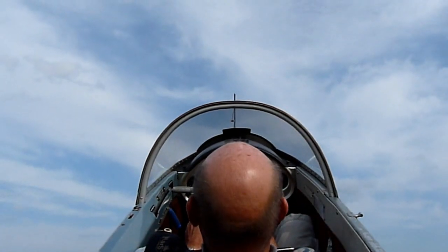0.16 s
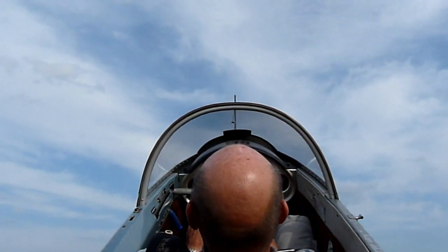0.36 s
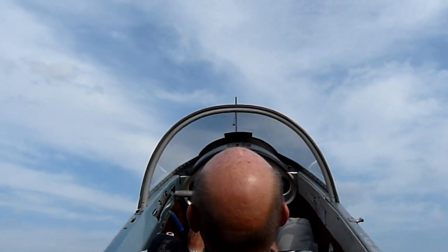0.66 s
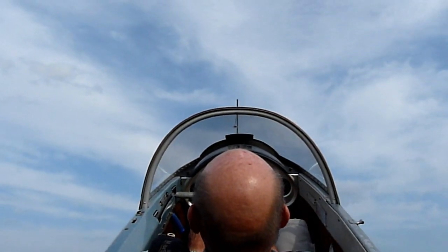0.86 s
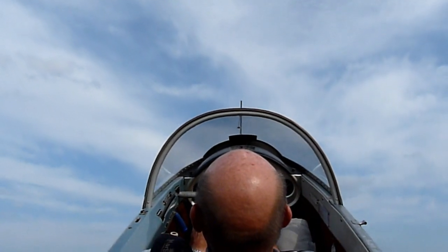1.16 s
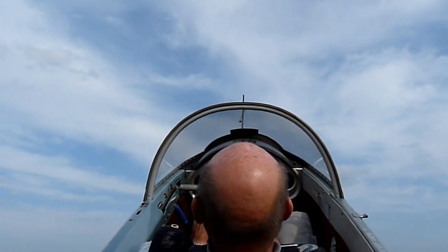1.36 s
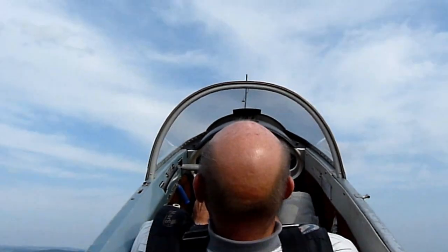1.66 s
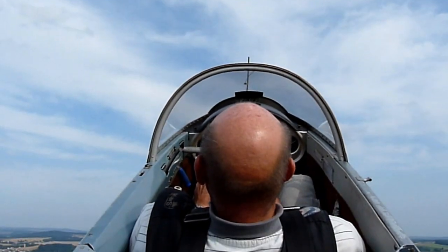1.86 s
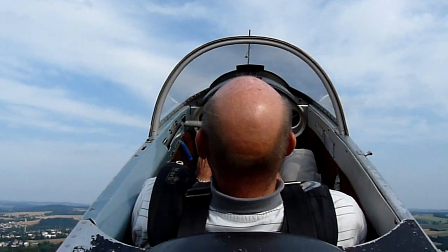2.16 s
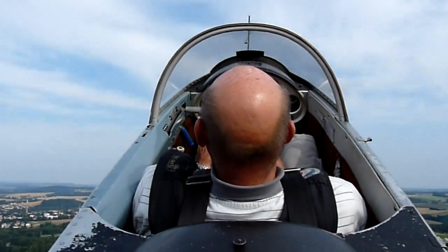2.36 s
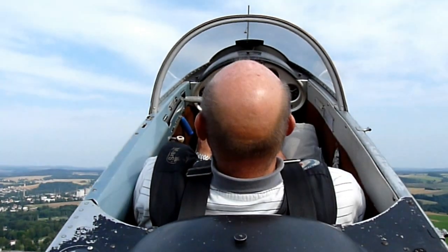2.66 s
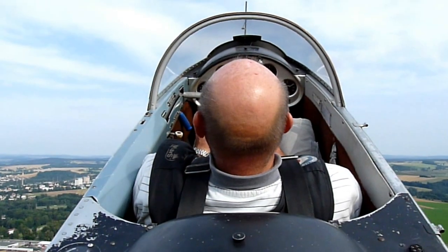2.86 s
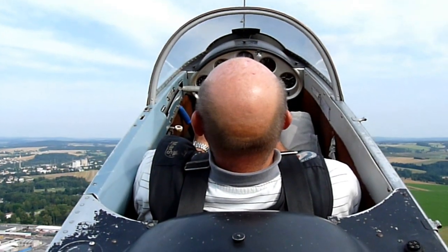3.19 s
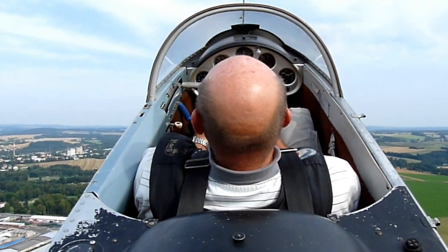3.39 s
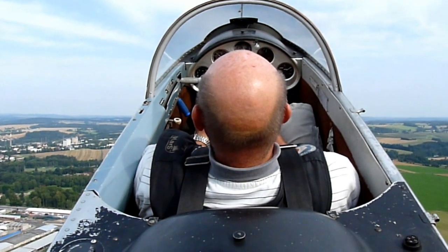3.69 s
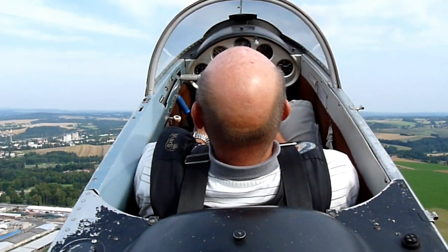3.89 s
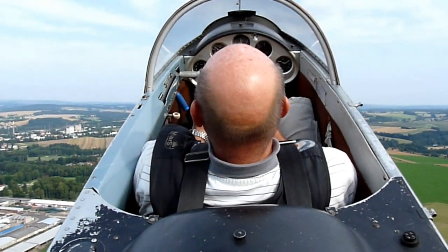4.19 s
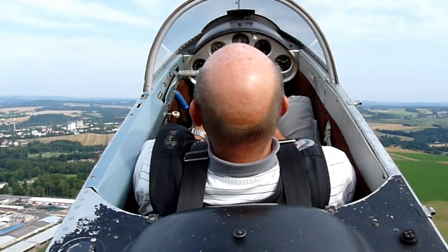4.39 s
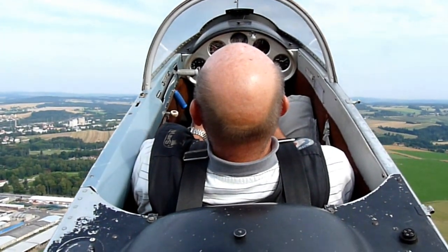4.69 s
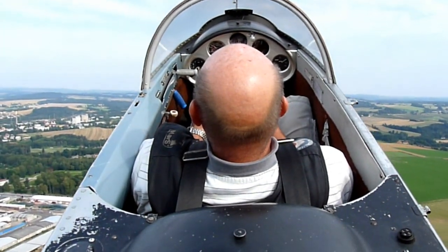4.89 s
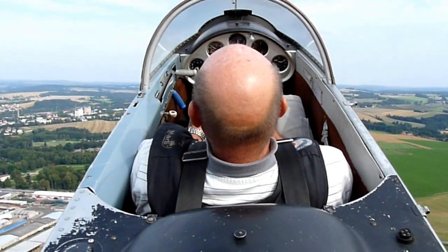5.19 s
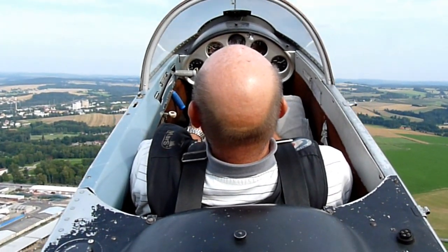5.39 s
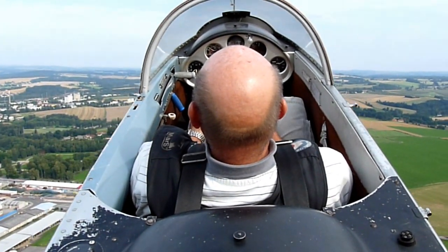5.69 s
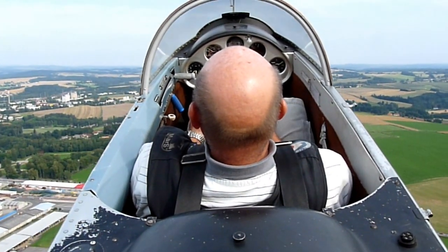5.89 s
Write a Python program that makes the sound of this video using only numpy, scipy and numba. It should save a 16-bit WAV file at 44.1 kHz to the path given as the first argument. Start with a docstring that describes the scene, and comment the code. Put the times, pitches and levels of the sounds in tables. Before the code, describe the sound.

Violent wind buffeting overloads a small camera microphone in an open glider cockpit: ragged low thuds, fluttering crackle and tiny dropouts, without pause.

```python
"""Air rushes past an open glider cockpit and buffets a small camera microphone far beyond its range.
The capsule slams between its two limits and often sticks at the lower one, so the wind arrives as bursts of
thuds with dead gaps; a wind-cut filter, a soft limit and a coarse low-rate converter shape what is left."""
import sys
import numpy as np
from scipy import signal
from scipy.fft import rfft, irfft
from scipy.io import wavfile
from numba import njit

SR = 44100
rng = np.random.default_rng(int(sys.argv[2]) if len(sys.argv) > 2 else 0)


def dump(signal):
    """Clip the signal to [-1, 1] and save it as 16-bit WAV at the path in sys.argv[1]."""
    limited = np.clip(np.atleast_2d(signal).T, -1, 1)
    pcm = np.round(limited * 32767).astype(np.int16)
    wavfile.write(sys.argv[1], SR, pcm)


N = 266805

# (s, small eddies in dB against the buffeting): the airflow slows and smooths as the nose comes down from the climb
TURBULENCE = [(0.0, -11.5), (0.4, -11.5), (0.8, -9.5), (1.2, -6.5), (1.6, -12), (2.0, -8.5), (2.4, -11), (2.8, -20.5), (3.2, -20), (3.6, -13), (4.1, -22), (4.6, -22), (5.0, -21), (5.3, -21.5), (5.7, -17.5), (6.05, -16)]
# the longer spells of suction, heard as dropouts, that hold the capsule at its lower limit: (s, length ms)
SUCTION = [(0.0173, 7.7), (0.0464, 10.8), (0.0661, 8.1), (0.0881, 10.5), (0.2205, 7.7), (0.2417, 10.8),
           (0.2532, 13.4), (0.3007, 10.3), (0.3423, 7.9), (0.3567, 10.3), (0.3745, 10.1), (0.4015, 8.7),
           (0.4224, 9.1), (0.4597, 8.2), (0.4688, 11.1), (0.4812, 8.2), (0.5347, 7.8), (0.55, 8.6), (0.5657, 9.5),
           (0.6232, 15.7), (0.6699, 8.0), (0.6787, 14.0), (0.7444, 9.3), (0.7686, 14.4), (0.7986, 11.0),
           (0.8162, 11.2), (0.8357, 8.8), (0.8682, 15.0), (0.8957, 15.5), (0.9288, 8.8), (0.9913, 10.0),
           (1.0315, 10.1), (1.0587, 9.3), (1.1025, 9.1), (1.1295, 14.6), (1.1574, 10.3), (1.1844, 12.8),
           (1.2022, 10.5), (1.245, 8.5), (1.2863, 8.2), (1.2961, 14.0), (1.3628, 13.7), (1.3811, 7.6),
           (1.4023, 8.0), (1.4131, 9.0), (1.4522, 11.8), (1.5051, 10.4), (1.5233, 11.1), (1.5394, 12.7),
           (1.5656, 8.2), (1.6067, 9.1), (1.6246, 11.3), (1.6359, 8.8), (1.6611, 8.3), (1.6741, 9.2),
           (1.6846, 13.9), (1.7212, 7.6), (1.7289, 13.8), (1.7488, 9.3), (1.7762, 10.7), (1.8085, 10.3),
           (1.8336, 7.8), (1.8436, 8.5), (1.8534, 9.4), (1.8647, 16.0), (1.8968, 12.2), (1.9126, 12.2),
           (1.9268, 13.0), (1.9689, 17.4), (1.993, 9.1), (2.0061, 7.9), (2.0188, 9.1), (2.037, 12.9), (2.0924, 9.1),
           (2.1306, 8.1), (2.1384, 10.0), (2.1519, 12.1), (2.1649, 10.8), (2.2278, 14.4), (2.2816, 9.6),
           (2.3113, 11.4), (2.342, 9.8), (2.3529, 8.0), (2.3665, 11.0), (2.3842, 7.9), (2.4077, 10.8),
           (2.4201, 8.1), (2.4433, 8.3), (2.4633, 12.5), (2.5455, 8.6), (2.555, 15.4), (2.5785, 9.9),
           (2.5954, 10.3), (2.6061, 8.1), (2.6222, 15.8), (2.6587, 8.4), (2.6753, 17.9), (2.7262, 9.5),
           (2.7368, 9.5), (2.7898, 13.8), (2.8254, 10.0), (2.8371, 11.0), (2.8481, 10.3), (2.8596, 9.9),
           (2.8992, 8.0), (2.9089, 18.1), (2.9525, 18.0), (2.9752, 19.9), (3.0117, 11.4), (3.0365, 10.7),
           (3.0589, 9.5), (3.0908, 21.3), (3.1317, 9.1), (3.1482, 10.4), (3.167, 12.9), (3.1888, 9.8),
           (3.2052, 15.3), (3.2821, 13.5), (3.32, 13.3), (3.3522, 10.7), (3.3717, 10.9), (3.3843, 10.0),
           (3.4162, 7.8), (3.427, 17.4), (3.4527, 9.9), (3.4951, 10.5), (3.5407, 8.3), (3.55, 10.2), (3.564, 7.6),
           (3.5714, 12.0), (3.5923, 10.1), (3.6196, 11.7), (3.6325, 9.3), (3.6431, 13.2), (3.6669, 15.7),
           (3.6834, 8.9), (3.7223, 8.7), (3.7384, 10.9), (3.77, 12.2), (3.7988, 16.0), (3.8295, 8.1), (3.8513, 9.6),
           (3.8649, 8.6), (3.8888, 7.6), (3.8972, 16.5), (3.9381, 11.1), (3.9624, 8.3), (3.9716, 13.4),
           (3.9897, 11.5), (4.0027, 7.7), (4.0436, 12.3), (4.0758, 10.5), (4.0873, 10.6), (4.0992, 24.9),
           (4.1372, 10.1), (4.1496, 11.8), (4.1619, 8.4), (4.2002, 9.3), (4.2226, 10.0), (4.2478, 15.1),
           (4.2846, 14.4), (4.3117, 9.8), (4.3384, 14.8), (4.3647, 11.1), (4.3978, 9.8), (4.4385, 8.1),
           (4.4501, 13.5), (4.4682, 14.1), (4.4851, 8.6), (4.4993, 10.7), (4.5333, 14.0), (4.5705, 18.1),
           (4.5892, 11.6), (4.6029, 9.6), (4.6232, 11.5), (4.6478, 10.6), (4.6678, 12.5), (4.6825, 13.4),
           (4.7076, 12.8), (4.7389, 9.4), (4.7498, 10.2), (4.7779, 15.0), (4.8114, 10.8), (4.8265, 13.5),
           (4.8398, 8.9), (4.8638, 25.2), (4.9139, 11.2), (4.936, 14.2), (4.9595, 10.2), (4.9723, 10.6),
           (4.9862, 11.6), (5.0187, 8.4), (5.0397, 8.4), (5.06, 10.6), (5.0844, 11.1), (5.1101, 12.8),
           (5.1341, 10.9), (5.1704, 12.7), (5.2126, 8.5), (5.2312, 18.1), (5.2621, 17.0), (5.2921, 7.6),
           (5.3148, 10.3), (5.3323, 9.4), (5.3831, 9.3), (5.4049, 13.1), (5.4278, 9.8), (5.4751, 9.2),
           (5.5054, 11.9), (5.5237, 16.1), (5.5671, 13.3), (5.6006, 12.3), (5.6639, 9.2), (5.7036, 10.7),
           (5.7222, 9.0), (5.7464, 13.5), (5.7628, 15.7), (5.7802, 8.6), (5.7887, 11.4), (5.8437, 15.1),
           (5.867, 15.2), (5.8957, 8.0), (5.9192, 11.8), (5.9395, 11.0), (5.9911, 9.0), (6.0017, 10.3),
           (6.0137, 8.0)]  # fixed
BUFFET = [(40, -8.5), (80, -1), (130, 2.5), (220, -2.5), (400, -7.5), (800, -37), (1500, -37)]  # large eddies: (Hz, dB per Hz)
EDDIES = [(200, 1.5), (500, 12.5), (900, 3.5), (1600, -5.5), (2500, -26)]  # small eddies: (Hz, dB per Hz)
FINEST = [(400, -4), (1000, 4.5), (2000, -7), (4000, -14)]  # finest eddies: (Hz, dB per Hz)
RATE = 16000  # fixed
STEP = 1 / 512  # fixed
WHINE_HZ = 20000 / 3  # fixed
EDGE_HZ = 9500  # fixed
# the strongest clumps of small eddies that make the capsule chatter: (s, length ms, beat Hz, dB against the buffeting)
FLURRIES = [(0.0275, 2, 672, -9.5), (0.0863, 2.8, 1026, 8.5), (0.235, 2, 1188, -7.5), (0.325, 3.6, 802, -5.5), (0.422, 3.2, 774, 4), (0.5464, 4.6, 588, -3),
            (0.6217, 3.5, 930, 12), (0.6533, 0.99, 1590, 11), (0.6656, 1.8, 1493, 1), (0.6694, 1.6, 1627, 12), (0.700, 4.6, 655, -5.5), (0.9129, 5.2, 635, 1.5),
            (0.9244, 3.5, 700, 3), (0.94, 4.4, 848, -1), (0.975, 2.9, 758, -7), (1.0066, 1.4, 1786, 11), (1.0107, 2.4, 1503, 9), (1.1831, 3.6, 790, 7),
            (1.2362, 3.4, 690, -5), (1.2772, 2.5, 657, -8), (1.4119, 3.5, 737, 6),
            (1.4844, 3.3, 720, -3), (1.5383, 2.7, 720, 16), (1.805, 5.9, 596, -2), (1.8219, 6, 715, 4),
            (1.893, 4.3, 747, 2), (1.9919, 4.7, 750, -4), (2.127, 1.9, 980, -3),
            (2.203, 5.1, 620, -9.5), (2.3292, 5.2, 571, 4), (2.8225, 6.5, 756, 0), (3.384, 3, 1100, -5), (3.402, 3.6, 596, -3),
            (3.8497, 2.6, 820, -11.5), (3.933, 1.9, 630, -11), (4.2815, 3.3, 604, -14), (5.222, 2.6, 608, -4.5), (5.2887, 2.9, 685, -6.5),
            (5.399, 1.8, 976, -8), (5.722, 3.4, 590, -2.5), (5.801, 3.3, 1000, -9)]
MEAN_PRESSURE = -0.27  # in units of the buffeting
SHORT_MS, SHORT_SPREAD_MS = 5.0, 2.6  # shorter spells come by chance: least length, and range above it  # fixed
PAUSE_MS, PAUSE_SPREAD_MS = 2.0, 9  # least pause between spells, and mean extra pause
WEAK_PER_S, WEAK_DB, WEAK_MS, WEAK_HZ = 5, 2.5, 2.5, 800  # weaker flurries come by chance, this far above the small eddies around them
WOBBLE = .11  # the beat of a flurry wanders by this share
BREAK_UP = .95  # share of the other eddies that a flurry destroys  # fixed
RAGGED_DB, RAGGED_FOLLOW = -16, 0.55  # the finest eddies fray every slam, and follow the small eddies by this share
# lone small vortices that snap the capsule towards its other limit for an instant: (s, width ms)
SNAPS = [(0.1072, .5), (0.2166, 0.6), (0.289, .5), (0.3196, 0.4), (0.4209, 0.42), (0.5446, 0.54), (0.622, 0.45), 
         (0.7023, 0.45), (0.7636, 0.46), (0.926, 0.6), (1.0034, .5), (1.0751, 0.44), (1.214, 0.48), (1.2252, .5), (1.2843, 0.33),
         (1.3328, 0.42), (1.3482, 0.54), (1.3515, 0.55), (1.357, 0.41), (1.4037, 0.38), (1.4126, 0.67), (1.499, .5), (1.5161, 0.55), (1.586, 0.58),
         (1.661, 0.38), (1.7054, 0.45), (1.7141, 0.27), (1.796, 0.56), (1.806, .5), (1.823, .5), (1.842, 0.78), (1.8938, 0.42), (1.9415, 0.43), (1.9463, 0.36),
         (1.9871, .5), (2.0183, 0.44), (2.0641, 0.55), (2.152, 0.46), (2.265, 0.35), (2.292, 0.58), (2.3985, 0.44), (2.9464, 0.39), (3.3831, 0.54),
         (3.4872, 0.4), (3.9322, 0.58), (4.4647, 0.46), (4.824, 0.45), (5.6132, 0.51), (5.6409, .35), (5.6491, .4), (5.801, 0.47), (6.0224, 0.45)]
SNAP_DB = 5  # against the buffeting


def gain_of(db):
    """dB to gain."""
    return 10 ** (np.asarray(db) / 20)


def noise(points):
    """Gaussian noise of rms 1 with the given spectrum."""
    hz, db = np.transpose(points)
    f = np.fft.rfftfreq(N, 1 / SR)
    shape = gain_of(np.interp(np.log(f + 1), np.log(hz + 1), db, left=-80, right=-80))
    x = irfft(rfft(rng.standard_normal(N)) * shape, N)
    return x / x.std()


def filtered(x, hz, kind, order=2):
    """Causal Butterworth filter."""
    return signal.sosfilt(signal.butter(order, hz, kind, fs=SR, output="sos"), x)


def two_pole_high_pass(x, hz, damping):
    """Second-order high-pass; a step in gives a spike and one overshoot."""
    w = 2 * np.pi * hz
    return signal.lfilter(*signal.bilinear([1, 0, 0], [1, 2 * damping * w, w * w], SR), x)


def suction(depth, rebound, rebound_ms, edge_ms):
    """A steep drop in pressure for each spell, with a push just before and just after it."""
    t, out = np.arange(N) / SR, np.zeros(N)
    for s, ms in SUCTION + short_spells():
        near = slice(max(round((s - .01) * SR), 0), round((s + ms / 1000 + .01) * SR))  # fixed
        before, after = 1000 * (s - t[near]), 1000 * (t[near] - s) - ms
        outside = np.maximum(before, after)  # ms from the nearer end, negative within the spell
        held = np.clip(-outside / edge_ms, 0, 1)
        out[near] += rebound * np.exp(-(np.maximum(outside, 0) / rebound_ms) ** 2) * (1 - held) - depth * held
    return out


def wind():
    """Pressure at the microphone port, in units of the capsule's whole travel."""
    t = np.arange(N) / SR
    fine_db = np.interp(t, *np.transpose(TURBULENCE))
    clumps_db = 3.6 * noise([(8, 0.5), (40, 3.5), (120, -7.5)])  # small eddies come in clumps
    small = gain_of(fine_db + clumps_db) * noise(EDDIES) + gain_of(RAGGED_DB + RAGGED_FOLLOW * fine_db + clumps_db) * noise(FINEST)
    chatter, passing = flurries()
    eddies = (noise(BUFFET) + MEAN_PRESSURE + small) * (1 - BREAK_UP * passing)
    spells = suction(depth=8, rebound=2.3, rebound_ms=1.1, edge_ms=1.6)  # fixed
    return .5 + gain_of(11.0) * snapped(eddies + chatter + spells)


@njit
def slow_fall(x, most, quick, settle):
    """Follows x at once upwards; lets go of the top slowly after a long rest there, quickly after a brief touch."""
    out, since_rise = x.copy(), 0.0
    for i in range(1, len(x)):
        since_rise = 0.0 if out[i - 1] <= 0 else since_rise + 1
        out[i] = max(x[i], out[i - 1] - most * (1 + quick * np.exp(-since_rise / settle)))
    return out


def soft_limit(x, ceiling, knee):
    """Straight for small signals, flat at the ceiling."""
    return x / (1 + abs(x / ceiling) ** knee) ** (1 / knee)


def short_spells():
    """Chance spells, one after another, wherever the long ones and the strong flurries leave room."""
    draw = rng.random((900, 2))  # fixed
    ms = SHORT_MS + SHORT_SPREAD_MS * draw[:, 0] ** 1.4
    s = np.cumsum(ms + PAUSE_MS - PAUSE_SPREAD_MS * np.log(1 - draw[:, 1])) / 1000 - ms / 1000
    start, length = np.transpose(SUCTION + [(at - long / 2000, long) for at, long, hz, db in FLURRIES] + SNAPS)[:, :, None]  # fixed
    clash = (s < start + (length + PAUSE_MS) / 1000) & (s + (ms + PAUSE_MS) / 1000 > start)
    return list(np.transpose([s, ms])[~clash.any(axis=0) & (s < N / SR)])


def weak_flurries():
    """Chance flurries whose strength follows the small eddies."""
    draw = rng.random((100, 2))  # fixed
    s = np.cumsum(-np.log(1 - draw[:, 0])) / WEAK_PER_S
    return list(zip(s, WEAK_MS + 0 * s, WEAK_HZ * (0.91 + .7 * draw[:, 1]), WEAK_DB + np.interp(s, *np.transpose(TURBULENCE))))


def flurries():
    """Short trains of small vortices, each with its own wandering beat; also tells when one is passing."""
    t, chatter, passing = np.arange(N) / SR, np.zeros(N), np.zeros(N)
    wander = noise([(50, 0), (400, 0)])  # fixed
    for (s, ms, hz, db), phase in zip(FLURRIES + weak_flurries(), rng.random(200)):
        near = slice(max(round((s - .01) * SR), 0), round((s + .01) * SR))  # fixed
        shape = np.exp(-(2000 * (t[near] - s) / ms) ** 4)  # fixed
        chatter[near] += gain_of(db) * shape * np.cos(2 * np.pi * (phase + np.cumsum(hz * (1 + WOBBLE * wander[near])) / SR))
        passing[near] = np.maximum(passing[near], shape * min(1, gain_of(db + 10)))  # fixed
    return chatter, passing


def snapped(pressure):
    """Reverses the pressure for an instant at every snap."""
    t, out = np.arange(N) / SR, pressure.copy()
    for s, ms in SNAPS:
        near = slice(round((s - .003) * SR), round((s + .003) * SR))  # fixed
        shape = np.exp(-(2000 * (t[near] - s) / ms) ** 4)  # fixed
        out[near] = (1 - shape) * out[near] - shape * gain_of(SNAP_DB) * np.sign(pressure[near] @ shape)
    return out


def scene():
    """Only the wind reaches the microphone."""
    return wind()[None]


def record(dry):
    """Capsule limits, wind-cut filter, amplifier limit, treble roll-off, coarse converter, band limit."""
    travel = np.clip(dry[0], 0, 1)  # hard stop at both ends
    travel = slow_fall(travel, 1000 / (.65 * SR), quick=2.4, settle=0.00073 * SR)  # up at once, but down no faster than its travel in under a ms
    thuds = 0.87 * two_pole_high_pass(travel, 177, 0.81)
    thuds = thuds - 0.047 * filtered(travel, 27, "high", order=1)  # the rest level creeps back slowly after each slam
    limited = soft_limit(thuds, ceiling=np.where(thuds > 0, .385, .42), knee=np.where(thuds > 0, 4.0, 6.0))
    dull = filtered(filtered(limited, 1060, "low", order=1), 2700, "low")
    dull = filtered(dull, 5200, "low", order=4)
    t = np.arange(N) / SR
    # a faint electrical whine and hiss join before the converter
    whine = gain_of(-77) * np.sin(2 * np.pi * WHINE_HZ * t)  # fixed
    analog = dull + .005 + whine + gain_of(-70.0) * rng.standard_normal(N)
    samples = STEP * np.round(signal.resample_poly(analog, 160, 441, padtype="edge") / STEP)  # fixed
    # a gentle smoothing filter leaves mirror images just above half the converter rate
    smoothing = signal.firwin(441 * 9 + 1, RATE / 2, window=("kaiser", 5), fs=441 * RATE)  # fixed
    smooth = signal.resample_poly(samples, 441, 160, window=smoothing, padtype="edge")[:N]  # fixed
    band = signal.firwin(41, EDGE_HZ, window=("kaiser", 9), fs=SR)  # fixed
    return signal.oaconvolve(np.pad(smooth, 20, "edge"), band, "valid")[None]  # fixed


dry = scene()
out = record(dry)
dump(out)
```